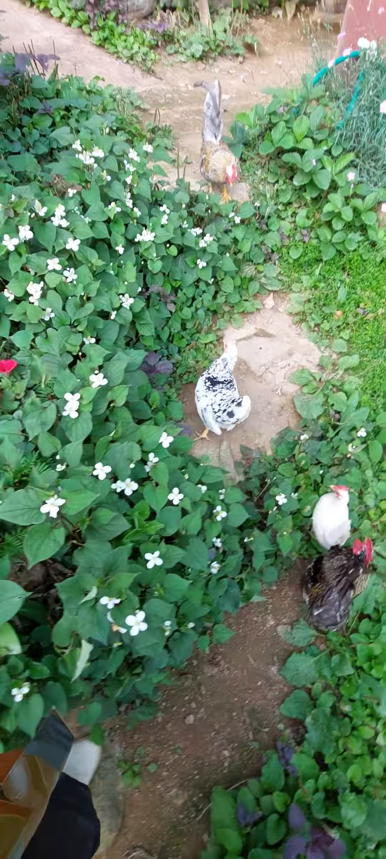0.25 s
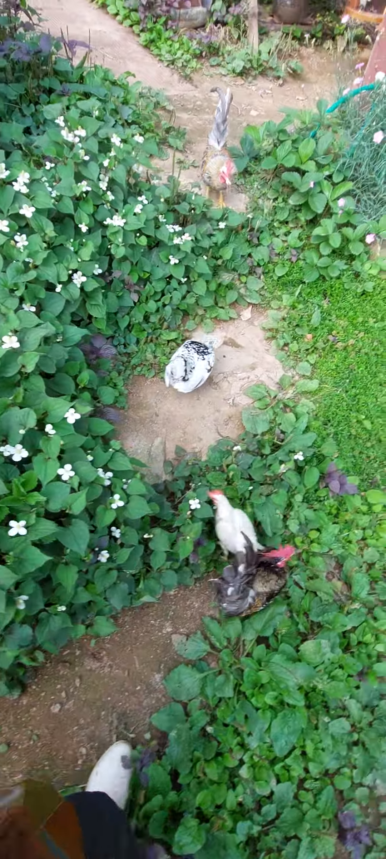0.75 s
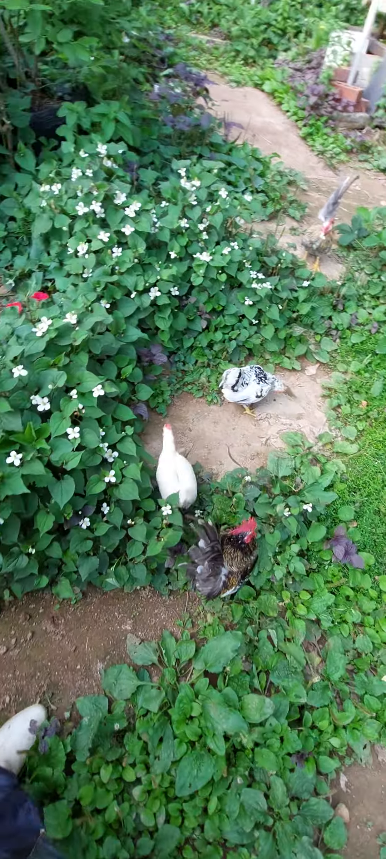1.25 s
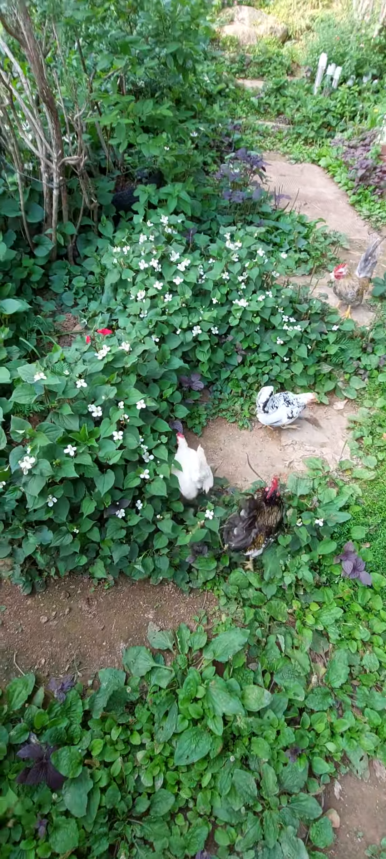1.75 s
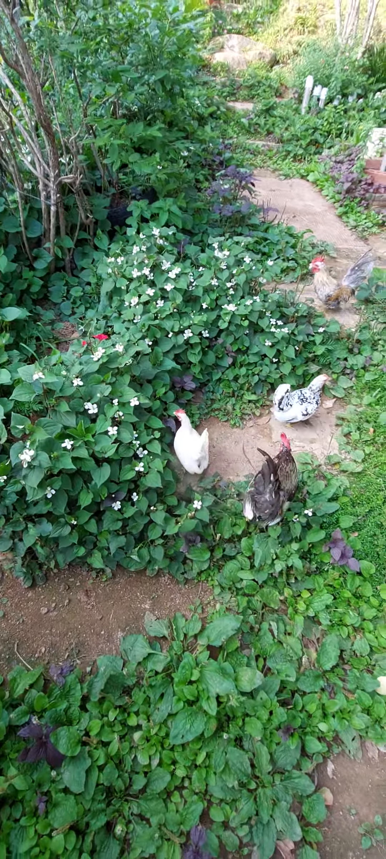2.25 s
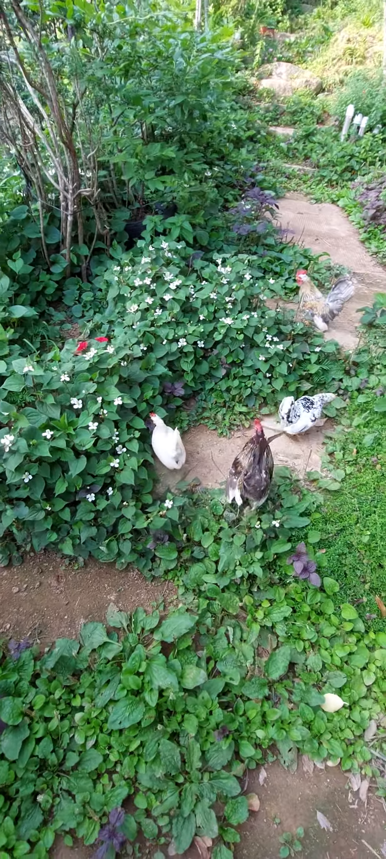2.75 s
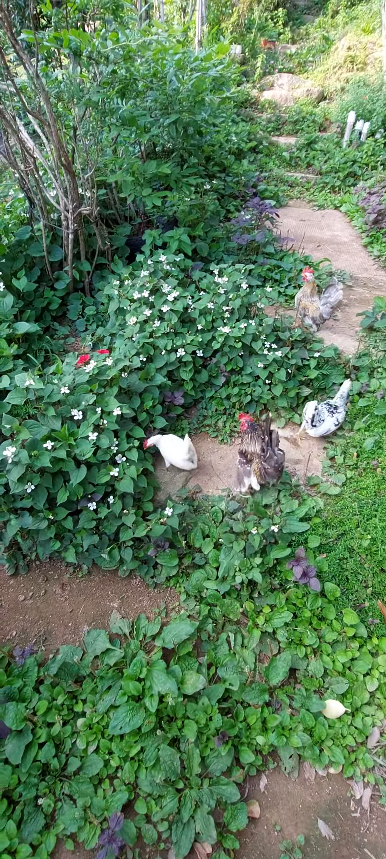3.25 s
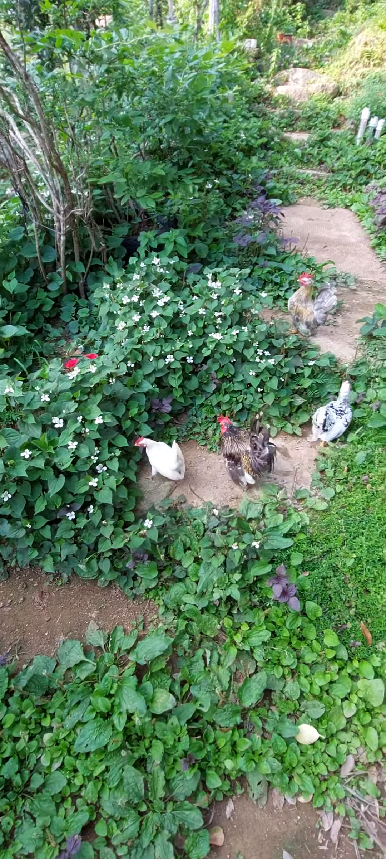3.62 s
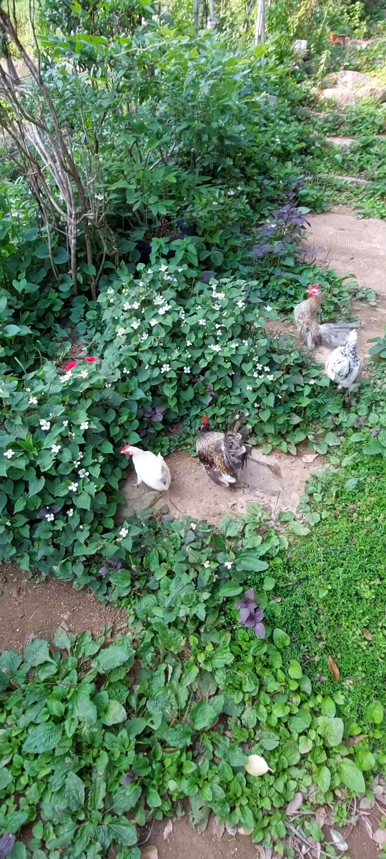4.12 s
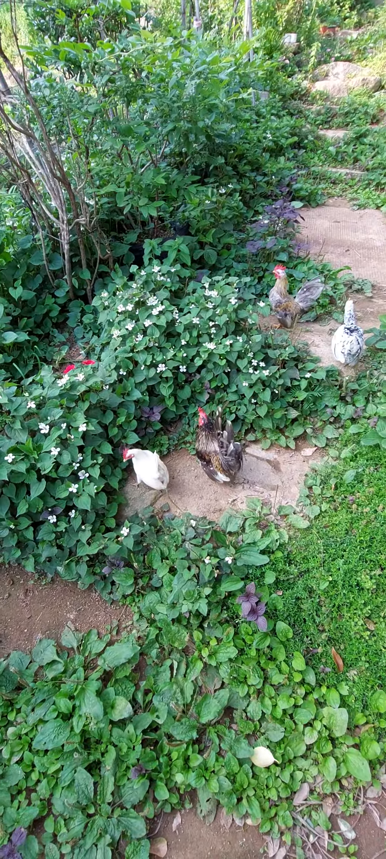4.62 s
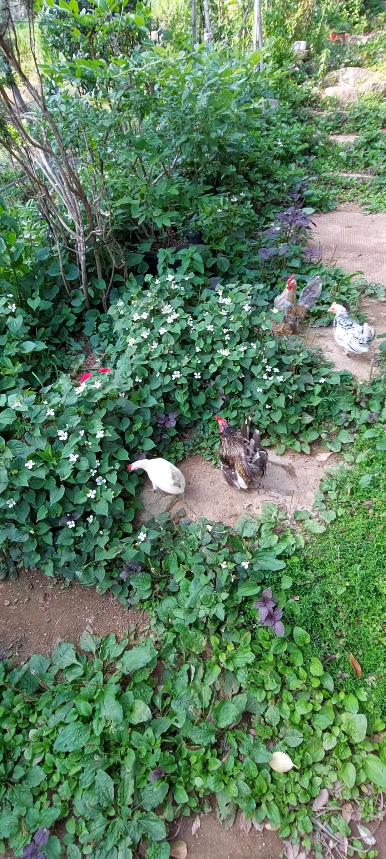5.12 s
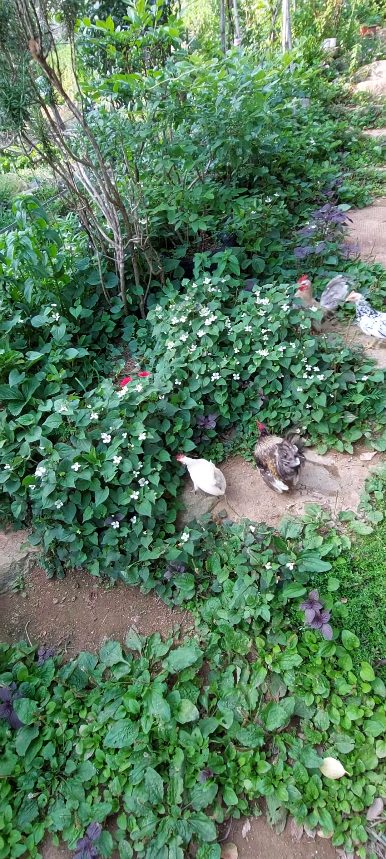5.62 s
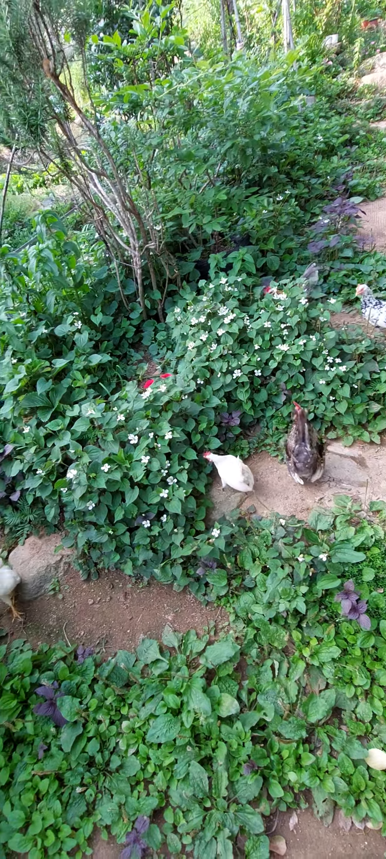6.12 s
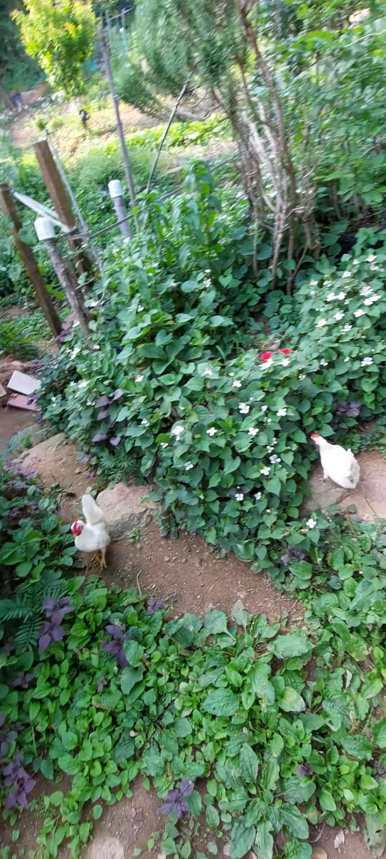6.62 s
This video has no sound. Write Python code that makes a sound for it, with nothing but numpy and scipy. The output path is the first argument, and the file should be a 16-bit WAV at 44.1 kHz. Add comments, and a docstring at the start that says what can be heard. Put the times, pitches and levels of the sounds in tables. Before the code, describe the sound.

Soft outdoor air fills a leafy garden as a distant hen gives one faint, brief cry. Nearer chickens start a run of small clucks and pips, livelier at first and quieter later, with a slight echo from shrubs and walls. Scattered sharp ticks of pecking and short, high rustles of plants mix in. A few low wind buffets hit the microphone on the right, the last being the loudest.

```python
"""Chickens in a leafy backyard garden

Chickens cluck and pip a few metres away: syrinx pulses and breath noise through throat and beak
resonances. High, rustling hiss swells briefly, often with the clucks. Pecks and stalks tick, and wind
thumps dully on the right microphone. A far hen cries once; shrubs and walls echo faintly over soft air."""
import sys
import numpy as np
from scipy import signal
from scipy.fft import rfft, irfft
from scipy.io import wavfile
from scipy.ndimage import uniform_filter1d

SR = 44100
rng = np.random.default_rng(int(sys.argv[2]) if len(sys.argv) > 2 else 0)


def wav_record(signal):
    """Record a signal, one row per channel, as 16-bit PCM in the file named by sys.argv[1]."""
    frames = np.transpose(np.atleast_2d(signal))
    bounded = np.clip(frames, -1, 1)
    # unit amplitude maps onto the largest positive 16-bit level
    quanta = np.round(bounded * 32767).astype(np.int16)
    wavfile.write(sys.argv[1], SR, quanta)


N = 302790
TIME = np.arange(N) / SR


def cluck(length_s, db, start_hz, end_hz, throat_hz, beak_hz, beak_db, rough, pan_db,
          width_hz=328, lead_s=0.02, size=4096):
    """Arched glide of syrinx pulses, a noise puff each cycle, through throat and beak resonances."""
    # open-beak overtones: (frequency [Hz], gain [dB])
    open_beak = [(400, 4), (1800, -1), (2600, -9), (3300, -12.5), (4200, -8.5), (5500, -16.5),
                 (8000, -22.5), (15000, -44)]
    progress = np.clip((np.arange(size) / SR - lead_s) / length_s, 0, 1)
    arch = 1 - 0.06 * (2 * progress - 1) ** 2
    pitch_hz = (start_hz + (end_hz - start_hz) * progress) * arch
    jitter = (0.017 + 0.08 * rough) * wander(size, rate_hz=210)
    cycles = np.cumsum(pitch_hz * (1 + jitter)) / SR
    pulses = sum(np.cos(2 * np.pi * k * cycles) for k in range(1, 14)) / 5
    puffs = unit_rms((1.6 + np.exp(-(cycles % 1) / 0.22)) * rng.standard_normal(size))
    # rough, falling notes start abruptly; rising ones peak later
    skew = 0.85 + np.clip(end_hz / start_hz - 1, -0.15, 0.25) - 0.29 * rough
    envelope = np.maximum(np.sin(np.pi * progress ** skew), 0) ** 0.55
    drive = ((1 - rough) * pulses + rough * puffs) * envelope
    hz = bins_hz(drive)
    throat = resonance(hz, throat_hz, width_hz)
    overtones = gain(-16 + 8 * rough + at_hz(open_beak, hz))  # harsh notes open the beak
    beak = resonance(hz, beak_hz, 0.13 * beak_hz) + overtones
    voice = (throat + gain(beak_db) * beak) / np.sqrt(1 + (450 / (hz + 1)) ** 8)  # small bird: no bass
    # each channel has its own phase and ground bounce
    phase = rng.uniform(-1.2, 1.2, (2, 1))
    bounce_s = rng.uniform(0.0007, 0.003, (2, 1))
    paths = np.exp(1j * phase) * (1 + 0.66 * np.exp(-2j * np.pi * hz * bounce_s))
    note = np.array([unit_rms(channel) for channel in irfft(rfft(drive) * voice * paths)])
    pan = unit_rms(gain([[pan_db / 2], [-pan_db / 2]]))
    return gain(db) * note * np.sqrt(size / SR / length_s) * pan


def chickens(lead_s=0.02):
    """Clucks, plus pips: near-pure rising notes through a narrow throat resonance, beak nearly shut."""
    # (time [s], length [s], level [dB], glide start [Hz], glide end [Hz], throat resonance [Hz],
    #  beak resonance [Hz], beak gain [dB], roughness [0-1], left minus right [dB])
    clucks = [(0.585, 0.019, -59.5, 584, 484, 785, 3187, -38, 0.16, 2),
              (0.819, 0.028, -38, 658.5, 680, 1120, 3780, -34, 0, -2),
              (0.835, 0.044, -45.5, 622.5, 511, 790, 4180, -24, 0.14, -3),
              (1.018, 0.026, -41.5, 633, 665, 924, 1710, -21, 0.12, -1.5),
              (1.237, 0.0239, -44, 599, 627, 716, 1400, -16, 0.29, -1.5),
              (1.396, 0.024, -38.5, 695.5, 873, 960, 2600, -7, 0.08, 2),
              (1.406, 0.024, -40.5, 795, 845, 970, 4900, -17, 0.83, -1.5),
              (1.5567, 0.031, -47, 670, 588, 760, 3440, -19, 0.64, 1),
              (1.727, 0.032, -44, 660, 750, 860, 4070, -12, 0.31, 2),
              (1.8647, 0.029, -49.5, 622.4, 912, 1300, 4360, -39, 0.28, 0.5),
              (1.887, 0.042, -52.5, 796, 715, 970, 1603, -15, 0.5, 5),
              (1.952, 0.024, -52, 629, 594, 815, 3300, -23, 0.05, -2),
              (2.09, 0.029, -46, 524.5, 773, 1230, 4640, -31, 0.26, 0.5),
              (2.2555, 0.033, -43, 565, 570, 1000, 4160, -34, 0, 1),
              (2.3998, 0.029, -44.5, 569, 580, 890, 4120, -32, 0.13, 1.5),
              (2.7503, 0.046, -49, 598, 516, 580, 1650, -31, 0.17, -7),
              (2.8646, 0.037, -48, 620, 514, 870, 1657, -32, .07, 1),
              (3.6253, 0.035, -56.5, 675.5, 720, 770, 1989, -25, 0.47, 4),
              (3.658, 0.026, -50.5, 456, 517, 780, 1620, -16, 0.14, 0),
              (3.841, 0.027, -51, 526, 493, 990, 1940, -15, 0.13, 3.5),
              (4.024, 0.02, -66.5, 518, 603, 1520, 4126, -28, 0.52, 1),
              (4.134, .026, -56.5, 623, 492, 576, 4540, -15, 0.25, -5),
              (4.2524, 0.029, -59.5, 732, 733, 1100, 2895, -32, 0.14, 5),
              (4.36, .048, -51.5, 790, 635, 1120, 1420, -41, 0.43, 2),
              (4.5047, 0.054, -53, 720, 779, 780, 1459, -17, 0.69, 4.5),
              (4.682, 0.049, -52.5, 772, 640, 656, 1650, -16, 0.77, 2),
              (4.8306, 0.029, -54, 675, 566, 740, 1900, -7, 0.56, 6),
              (4.9743, 0.027, -56, 757, 738, 930, 1760, -27, 0.5, 6),
              (5.138, 0.026, -50, 809.6, 807, 910, 3460, -16.5, 0.4, 6.5),
              (5.379, 0.024, -51.5, 702, 575, 1500, 2690, -4.5, 0.58, 2),
              (5.49, .053, -58, 870, 730, 1130, 1630, -30, 0.57, 3),
              (5.587, 0.031, -62.5, 717, 703, 900, 1480, -32, 0.18, 12),
              (5.633, 0.027, -53.5, 521, 536, 720, 1310, -18, 0.43, 0),
              (5.76, .027, -53, 746, 744, 630, 1660, -4, 0.26, 4),
              (5.868, 0.03, -49, 625.4, 503, 815, 1210, -15, 0.38, 2.5),
              (5.892, 0.0484, -56.5, 618, 741, 910, 1259, -30, 0, 4),
              (6.0724, 0.0277, -49, 673, 523, 1060, 1700, -5, 0.12, 4.5),
              (6.362, 0.023, -56, 554, 518, 910, 1740, -18, 0.42, 0),
              (6.6487, 0.038, -53.5, 584.5, 467, 765, 1210, -40, 0.5, -1.5)]
    # (time [s], length [s], level [dB], glide start [Hz], glide end [Hz], left minus right [dB])
    pips = [(0.627, 0.026, -43, 654, 778, -7), (2.193, 0.028, -47.5, 563, 685, -7),
            (2.322, 0.038, -41, 655, 892, 3.5), (2.472, .042, -41, 570, 856, -4),
            (2.625, 0.045, -40, 549, 810, -1.5)]
    mix = np.zeros((2, N))
    for time_s, *note in clucks:
        add(mix, time_s - lead_s, cluck(*note, lead_s=lead_s))
    for time_s, *note, pan_db in pips:
        pip = cluck(*note, throat_hz=750, width_hz=165, beak_hz=1580, beak_db=-24, rough=0.15,
                    pan_db=pan_db, lead_s=lead_s)
        add(mix, time_s - lead_s, pip)
    return mix


def ticks(size=6000):
    """Pecks and snapping stalks: broad noise bursts that die at once."""
    # (time [s], peak [dB], band centre [Hz], t60 [s])
    snaps = [(0.328, -36.5, 4000, 0.052), (1.201, -38, 2820, .05), (1.338, -29, 1110, 0.0086),
             (1.676, -36, 10100, 0.024), (1.774, -37.5, 8240, 0.029), (2.404, -42, 8000, 0.011),
             (2.46, -28, 5400, 0.03), (2.466, -31, 1840, 0.025), (3.066, -42, 1890, 0.021),
             (3.355, -40, 1030, 0.061), (4.237, -47, 3020, 0.075), (4.295, -50.5, 9050, 0.13),
             (4.451, -55, 9300, 0.033), (5.793, -38.5, 6700, 0.13), (5.871, -35, 9900, 0.079),
             (5.976, -49.5, 7100, 0.085), (6.215, -51.5, 5000, 0.0069)]
    t = np.arange(size) / SR
    mix = np.zeros((2, N))
    for time_s, peak_db, hz, t60_s in snaps:
        burst = rng.standard_normal((2, size)) * gain(-60 * t / t60_s)
        snap = bandpass(burst, [0.75 * hz, 1.35 * hz])
        add(mix, time_s, gain(peak_db) * snap / abs(snap).max())
    return mix


def rustling_hiss(gain_db=3.5, flutter_db=0.88, band_grains_per_s=700):
    """Tiny crackles in seven high bands over smooth noise, in brief swells."""
    # (frequency [Hz], density [dB])
    spectrum = [(150, 8), (260, 10.5), (500, 6.5), (880, 5), (1500, 1), (1830, 0.5), (2020, -0.5),
                (3050, -5), (4570, -4), (4940, -4), (8660, -8.5), (11600, -3.5), (15800, -9.5)]
    crackle = np.zeros((2, N))
    edges_hz = np.geomspace(1500, 16000, 8)
    for band_hz in zip(edges_hz, edges_hz[1:]):
        grains = np.zeros((2, N))
        hit = rng.random((2, N)) < band_grains_per_s / SR
        grain_db = 3.4 * np.minimum(rng.exponential(1, hit.sum()), 6)
        grains[hit] = gain(grain_db) * rng.choice([-1, 1], hit.sum())
        crackle += bandpass(grains, band_hz)
    hiss = unit_rms(crackle) + rng.standard_normal((2, N))
    hiss = unit_rms(equalise(hiss, at_hz(spectrum, bins_hz(hiss))))
    pan = gain([[1], [-1]])
    return hiss * hiss_swells() * gain(gain_db + flutter_db * wander(N, rate_hz=35)) * pan


def hiss_swells(range_db=21.5):
    """Hiss gain: swells, many at the clucks, each climbing and sinking range_db in its rise and fall."""
    # (peak time [s], rise [s], fall [s], relative level [dB])
    swells = [(.04, 0.17, .25, -60), (.32, 0.25, 0.14, -51), (.67, .04, .15, -52.5),
              (0.718, 0.086, 0.027, -48), (.84, 0.56, 0.73, -52.5), (1.205, 0.023, 0.08, -45),
              (1.41, 0.15, 0.19, -46), (1.565, 0.026, 0.056, -45.5), (2.05, 0.027, .1, -53.5),
              (2.28, 0.24, .06, -58.5), (2.471, 0.041, 0.077, -45), (2.79, 0.29, 0.2, -56),
              (3.362, 0.09, 0.32, -54.5), (4.04, 0.41, 0.15, -59), (4.152, 0.15, 0.085, -45.5),
              (4.82, 0.077, 0.14, -69), (5.66, 0.036, 0.062, -64), (5.8, 0.065, 0.038, -59.5),
              (5.88, .03, 0.065, -58), (5.98, 0.027, 0.06, -72)]
    # faint hiss between swells: (time [s], relative level [dB])
    floor = [(0, -71.5), (.6, -74.5), (1.7, -55), (2.0, -62.5), (3.2, -64.5), (3.75, -74), (4.5, -72.5),
             (4.8, -64), (5.1, -79.5), (6.87, -74)]
    power = gain_curve(*np.transpose(floor)) ** 2
    for peak_s, rise_s, fall_s, db in swells:
        from_peak = np.maximum((peak_s - TIME) / rise_s, (TIME - peak_s) / fall_s).clip(0, 8)
        power += gain(db - range_db * from_peak) ** 2
    return np.sqrt(power)


def wind(attack_s=0.018, release_s=0.024, eddy_db=-1, eddy_cycles=0.63, left_db=-33):
    """Turbulence at the right microphone: puffs of rumble and sharp pressure swings from single eddies."""
    # (frequency [Hz], density [dB])
    spectrum = [(20, -31), (30, -20), (48, 7), (90, 6.5), (150, -6.5), (240, -5.5), (350, -17.5),
                (600, -25.5), (1500, -51), (5000, -88)]
    # (time [s], hold [s], level [dB])
    gusts = [(0, 0.062, -42.5), (0.275, .03, -50), (0.64, 1.9, -57.5), (1.207, 0.072, -48),
             (1.495, 0.043, -33.5), (1.642, 0.012, -41), (1.78, 0.011, -50), (3.352, 0.14, -36),
             (3.464, 0.073, -29), (3.59, 0.011, -49), (3.999, 0.013, -43.5), (4.13, 0.027, -68),
             (5.382, 0.044, -23), (5.462, 0.2, -28.5), (5.799, 0.044, -29.5), (5.935, 0.04, -42.5),
             (6.241, .012, -39.5)]
    # (time [s], relative level [dB], frequency [Hz])
    eddies = [(1.493, -18.5, 109), (1.504, -22, 195), (1.542, -20.5, 165), (3.413, -20.5, 142),
              (3.472, -9.5, 235), (3.4806, -8, 188), (3.5386, -11, 158), (5.4041, -5, 185),
              (5.474, -3.5, 165), (5.482, -7, 205), (5.499, -6, 114), (5.524, -9.5, 147), (5.536, -9, 196),
              (5.591, -11, 147), (5.799, -17.5, 218)]
    rumble = unit_rms(equalise(rng.standard_normal(N), at_hz(spectrum, bins_hz(TIME))))
    rumble /= np.sqrt(uniform_filter1d(rumble ** 2, size=1300) + 0.017)  # flatten its own swells
    pressure = np.zeros((1, N))
    for time_s, hold_s, db in gusts:
        before_s, after_s = np.maximum(time_s - TIME, 0), np.maximum(TIME - time_s - hold_s, 0)
        pressure += gain(db) * rumble * np.exp(-before_s / attack_s - after_s / release_s)
    t = np.arange(-SR // 40, SR // 40) / SR
    for time_s, db, hz in eddies:
        swing = np.sin(2 * np.pi * hz * t) / np.cosh(2 * hz * t / eddy_cycles)
        add(pressure, time_s + t[0], gain(db + eddy_db) * swing)
    return pressure * gain([[left_db], [0]])


def far_hen(throat_hz=1400, width_hz=300):
    """One falling, wavering cry; only harmonics near the throat resonance carry."""
    # (time [s], relative level [dB], pitch [Hz])
    cry = [(.19, -91, 401), (0.22, -60.5, 377), (.3, -62, 374), (.36, -82, 356)]
    time_s, db, pitch_hz = np.transpose(cry)
    hz = np.interp(TIME, time_s, pitch_hz) * (1 + 0.011 * wander(N, rate_hz=80))
    cycles = np.cumsum(hz) / SR
    note = sum(np.cos(2 * np.pi * k * cycles) * resonance(k * hz, throat_hz, width_hz)
               for k in range(2, 7))
    return unit_rms(note) * gain_curve(time_s, db)


def garden_echo(x, tap_chance=1 / 40):
    """Sparse reflections from shrubs and walls, different in each channel."""
    # (frequency [Hz], t60 [s])
    decay = [(200, 0.55), (1000, 0.16), (4000, 0.55), (12000, 0.022)]
    taps = rng.standard_normal((2, SR // 2)) * (rng.random((2, SR // 2)) < tap_chance)
    taps[:, :SR // 300] = 0  # pre-delay
    hz, t, frames = signal.stft(taps, SR, nperseg=256)
    frames = frames * gain(-60 * t / at_hz(decay, hz)[:, None])
    tail = signal.istft(frames, SR, nperseg=256)[1]
    return signal.fftconvolve(x.mean(0)[None], tail / np.linalg.norm(tail[0]), axes=1)[:, :N]


def air(wash_db=-60, sink_db_per_s=0.05, rumble_db=-57, split_hz=230):
    """Outdoor air: a steady rumble and a soft wash that drifts and slowly sinks."""
    # (frequency [Hz], density [dB])
    spectrum = [(15, -40), (25, -6), (86, -1), (189, -8.5), (403, 7), (691, 0.5), (1040, -0.5), (1360, -7),
                (1680, -8.5), (2260, -15.5), (2660, -16.5), (5230, -35), (5980, -31), (11700, -30.5),
                (15800, -55)]
    # (frequency [Hz], left-right correlation [0-1])
    correlation = [(50, 0.84), (250, 0.93), (700, 0.48), (2000, 0.32), (5000, 0.067), (15000, .1)]
    hz = bins_hz(TIME)
    left, independent = rfft(rng.standard_normal((2, N)))
    shared = at_hz(correlation, hz)
    right = shared * left + np.sqrt(1 - shared ** 2) * independent
    noise = np.array([left, right]) * gain(at_hz(spectrum, hz))
    lowpass = 1 / (1 + (hz / split_hz) ** 4)
    rumble = unit_rms(irfft(noise * lowpass, N))
    wash = unit_rms(irfft(noise * (1 - lowpass), N))
    drift_db = wander(N, rate_hz=3) - sink_db_per_s * (TIME - TIME.mean())
    return gain(rumble_db) * rumble + gain(wash_db + drift_db) * wash


def gain(db):
    return 10 ** (np.asarray(db) / 20)


def gain_curve(time_s, db):
    """Gain per sample, silent outside the span."""
    return gain(np.interp(TIME, time_s, db, left=-120, right=-120))


def unit_rms(x):
    return x / np.sqrt(np.mean(x ** 2) + 1e-20)


def at_hz(table, hz):
    """Table lookup on a log-frequency axis."""
    knots_hz, values = np.transpose(table)
    return np.interp(np.log(hz + 1), np.log(knots_hz + 1), values)


def bins_hz(x):
    return np.fft.rfftfreq(x.shape[-1], 1 / SR)


def resonance(hz, centre_hz, width_hz):
    return 1 / (1 + ((hz - centre_hz) / width_hz) ** 2)


def bandpass(x, band_hz):
    return signal.lfilter(*signal.butter(1, band_hz, "band", fs=SR), x)


def equalise(x, bin_db):
    return irfft(rfft(x) * gain(bin_db), x.shape[-1])


def wander(count, rate_hz):
    """Smooth random curve, rms 1."""
    noise = rng.standard_normal(count)
    return unit_rms(irfft(rfft(noise) / (1 + (bins_hz(noise) / rate_hz) ** 4), count))


def add(mix, time_s, sound):
    part = mix[:, max(round(time_s * SR), 0):][:, :sound.shape[-1]]
    part += sound[..., :part.shape[1]]


def scene(echo_db=-16, far_hen_db=-1):
    """Birds and ticks with their echo, over hiss, air and wind."""
    direct = gain(far_hen_db) * far_hen() + chickens() + ticks()
    return direct + gain(echo_db) * garden_echo(direct) + rustling_hiss() + air() + wind()


def record(dry, low_hz=36, high_hz=15900):
    """Bass cut and band limit."""
    bass_cut_db = -10 * np.log10(1 + (low_hz / (bins_hz(dry) + 1)) ** 8)
    lowpass = signal.firwin(511, high_hz, window=("kaiser", 9), fs=SR)
    return signal.oaconvolve(equalise(dry, bass_cut_db), lowpass[None], "same")


dry = scene()
out = record(dry)
wav_record(out)
```